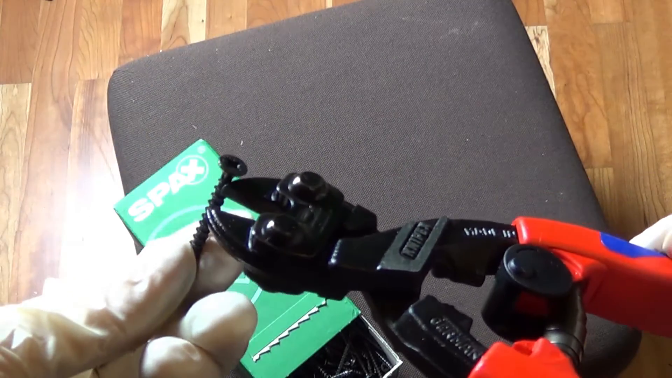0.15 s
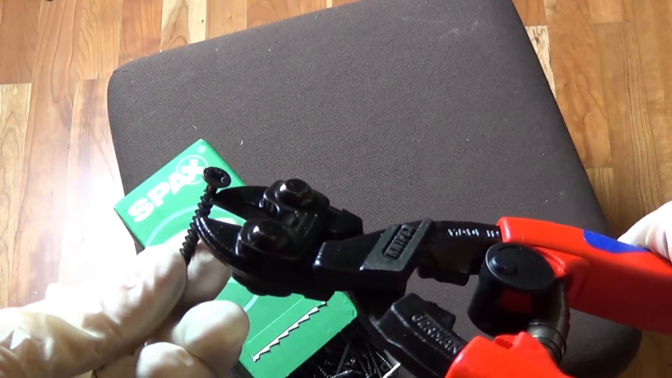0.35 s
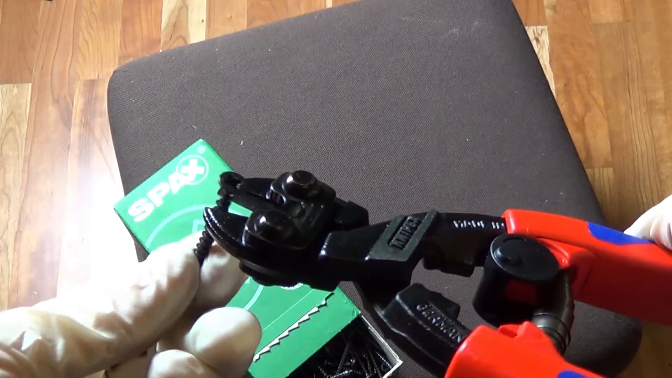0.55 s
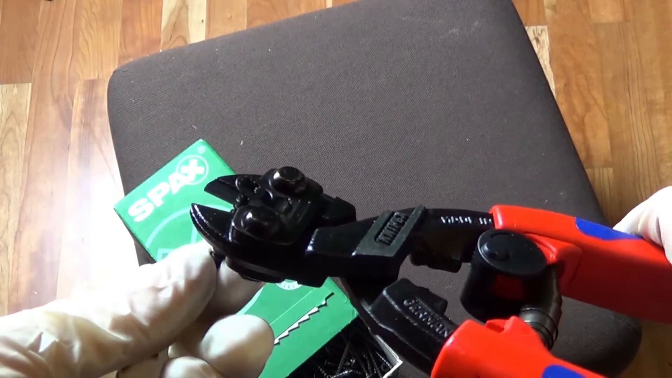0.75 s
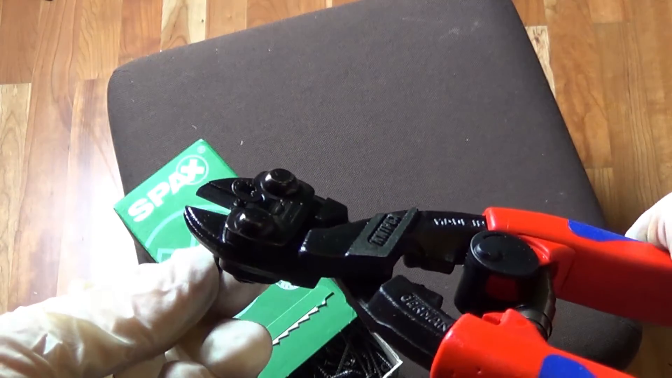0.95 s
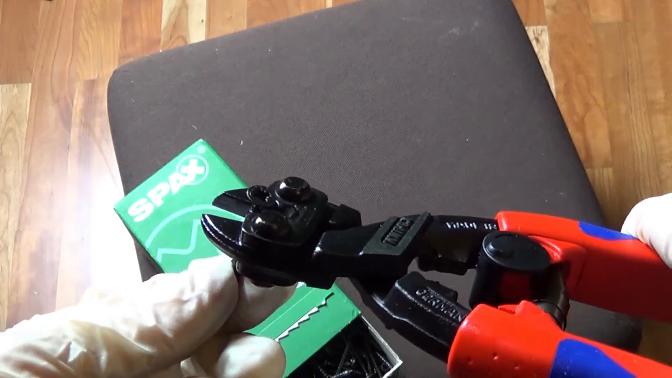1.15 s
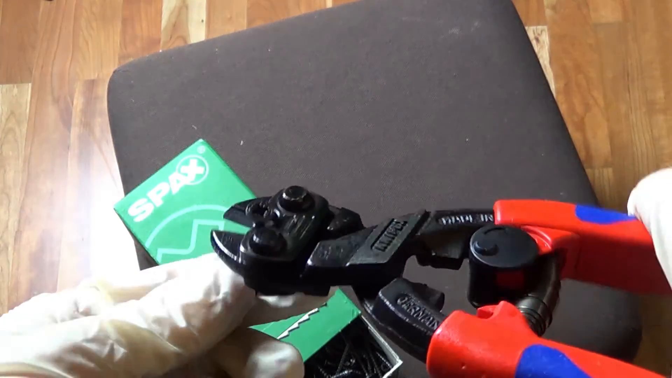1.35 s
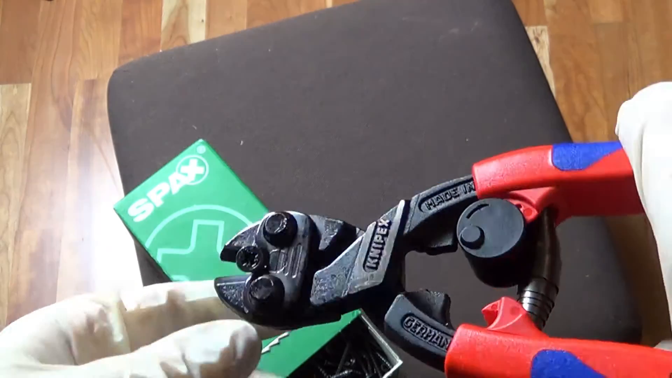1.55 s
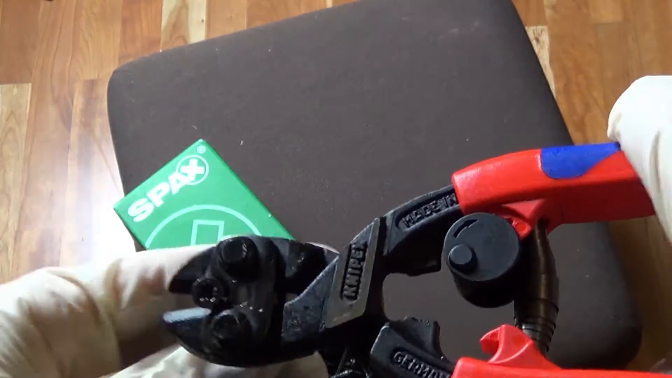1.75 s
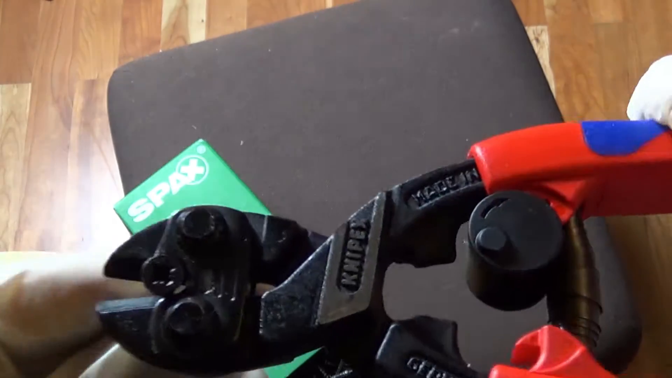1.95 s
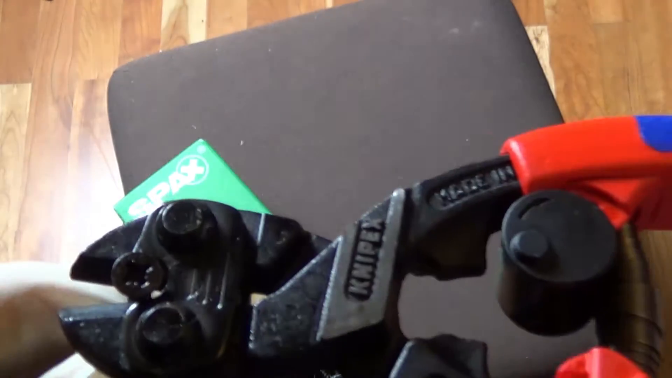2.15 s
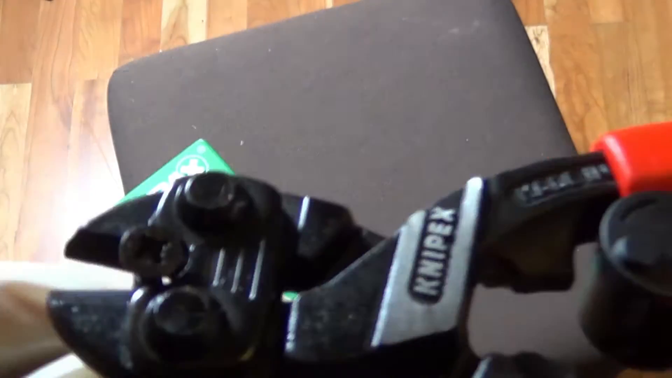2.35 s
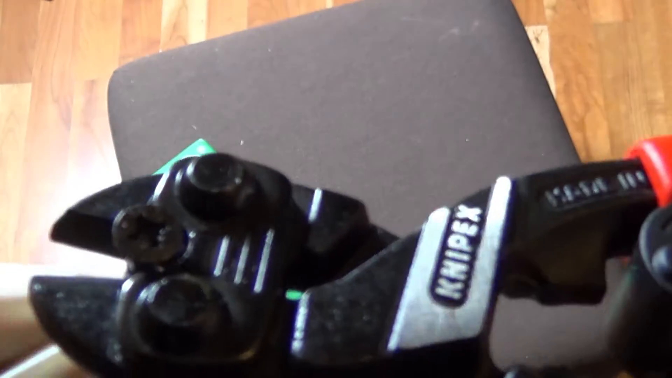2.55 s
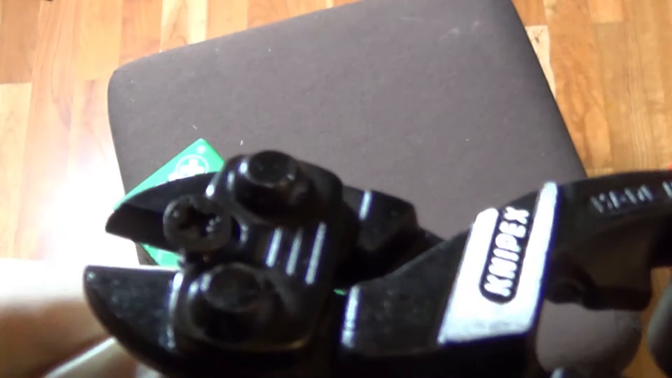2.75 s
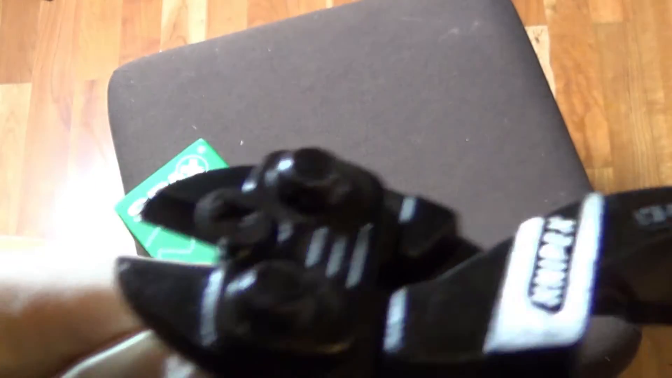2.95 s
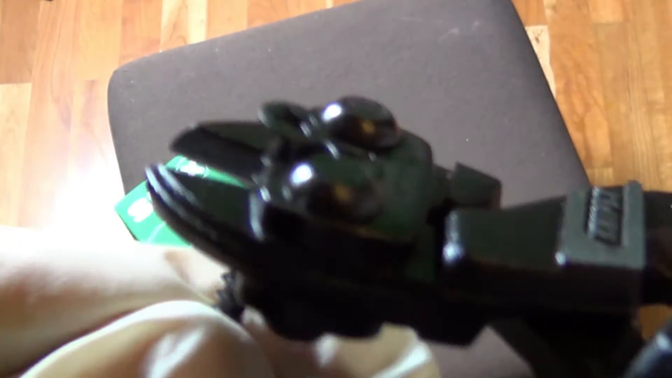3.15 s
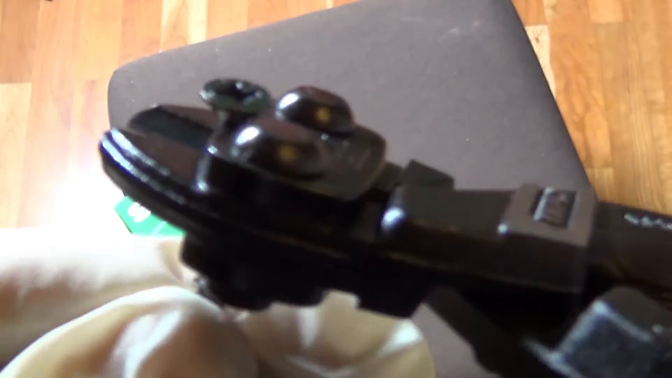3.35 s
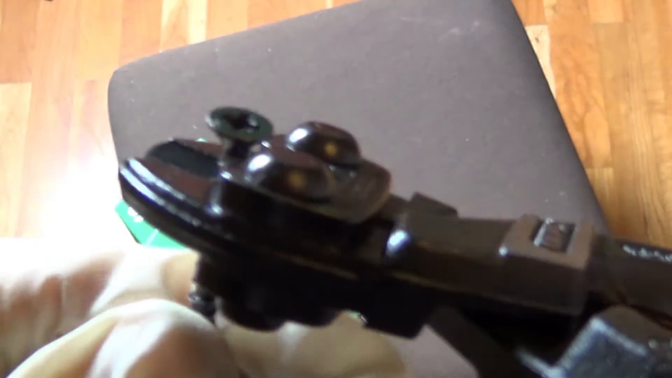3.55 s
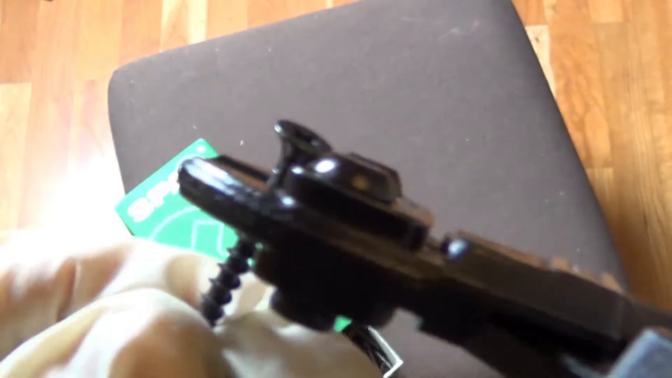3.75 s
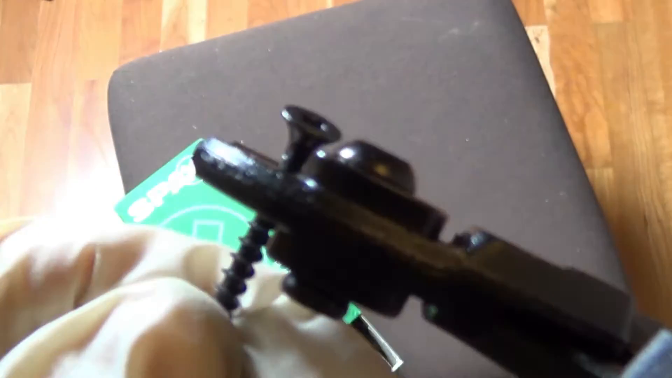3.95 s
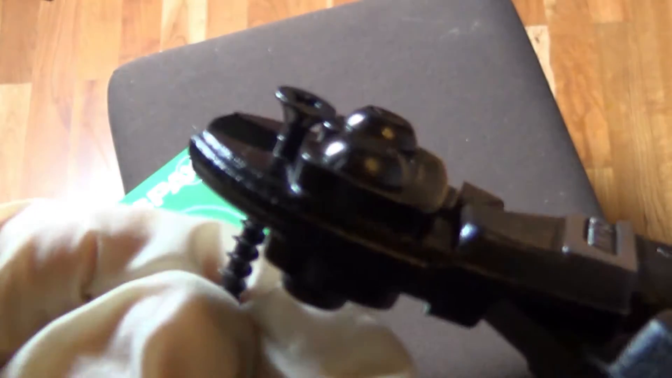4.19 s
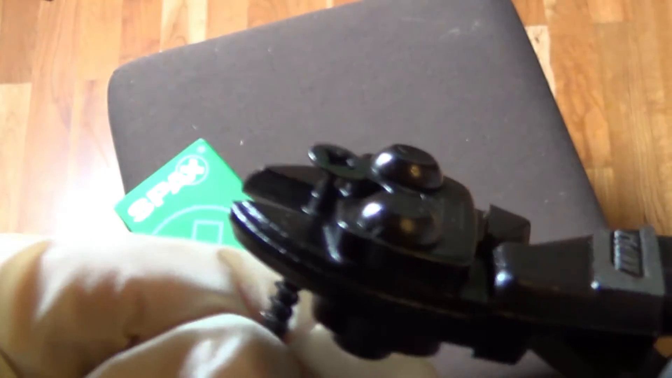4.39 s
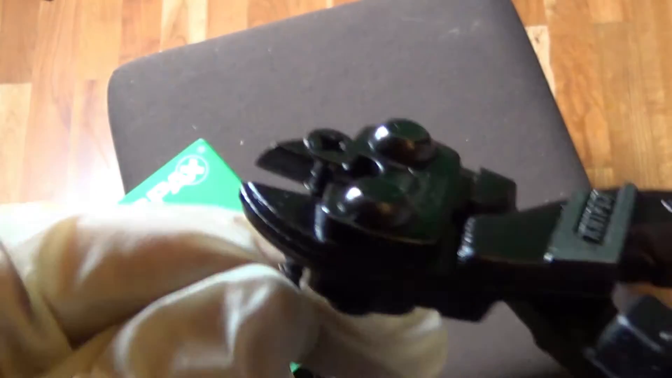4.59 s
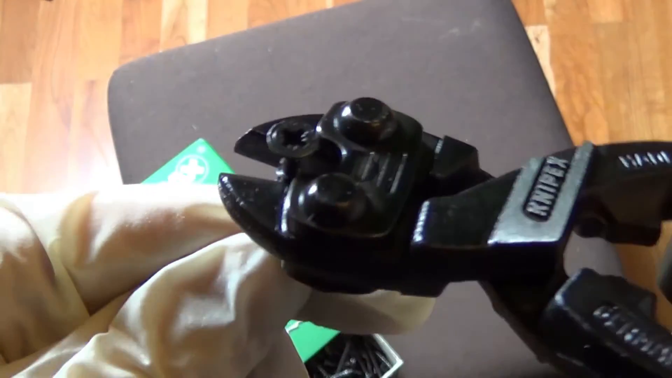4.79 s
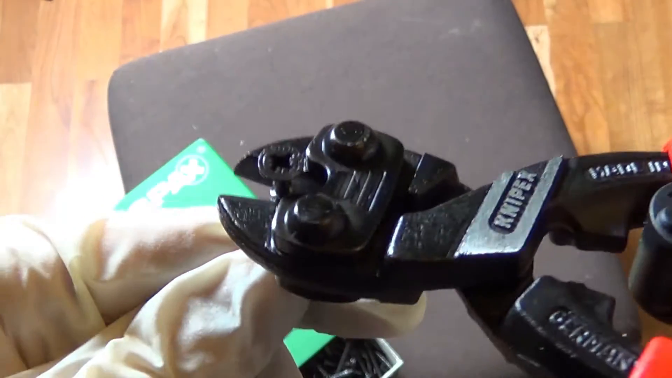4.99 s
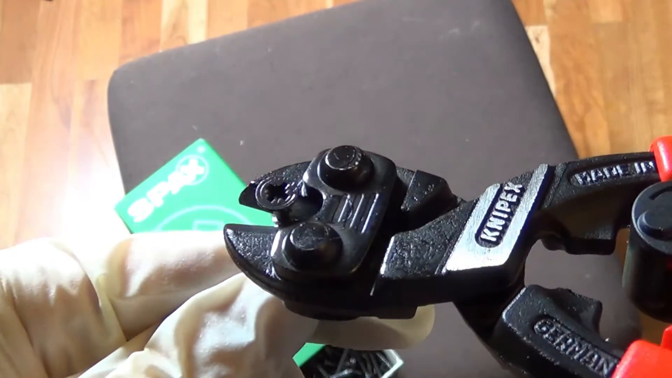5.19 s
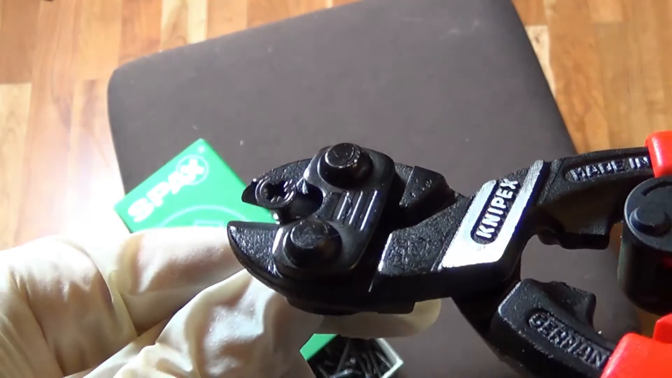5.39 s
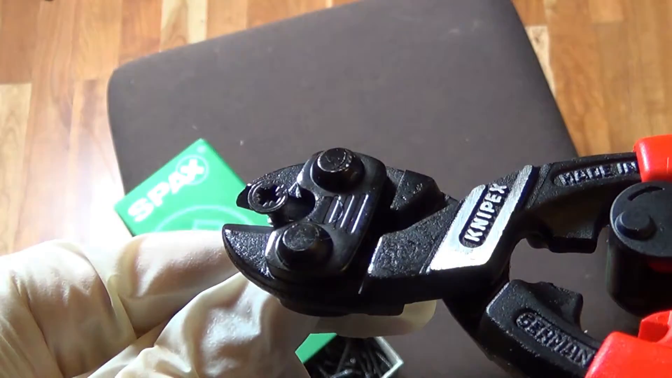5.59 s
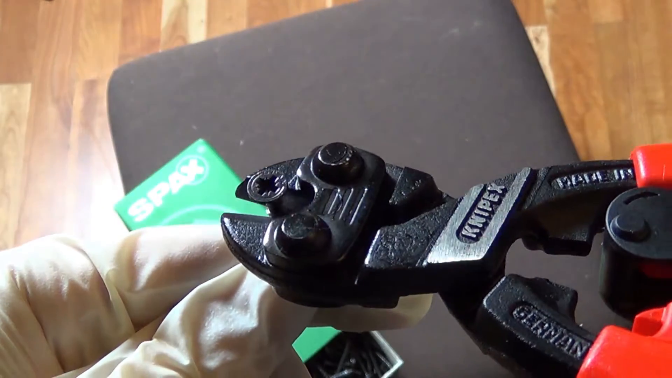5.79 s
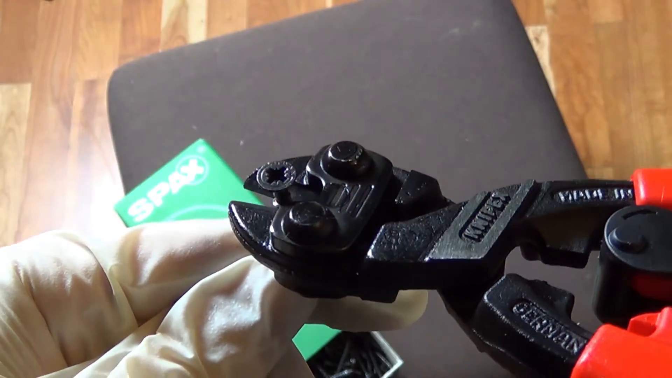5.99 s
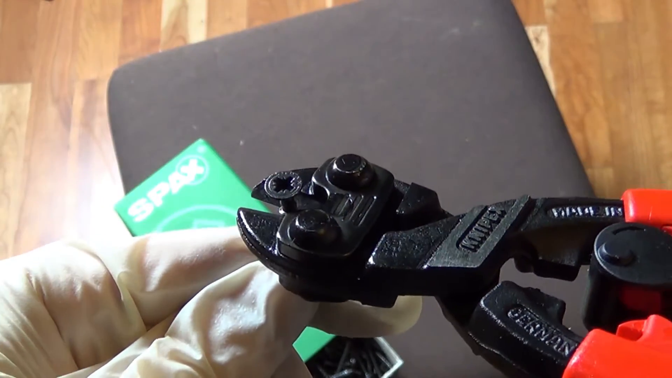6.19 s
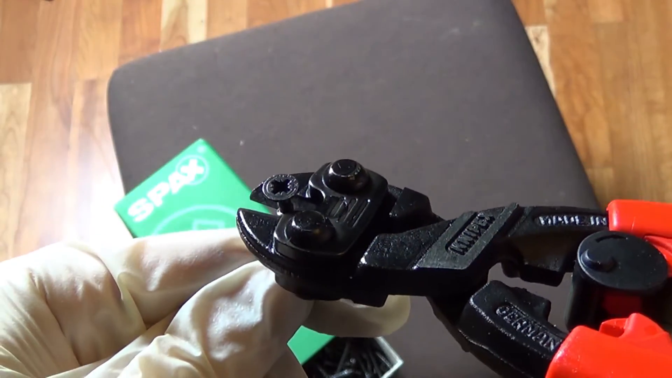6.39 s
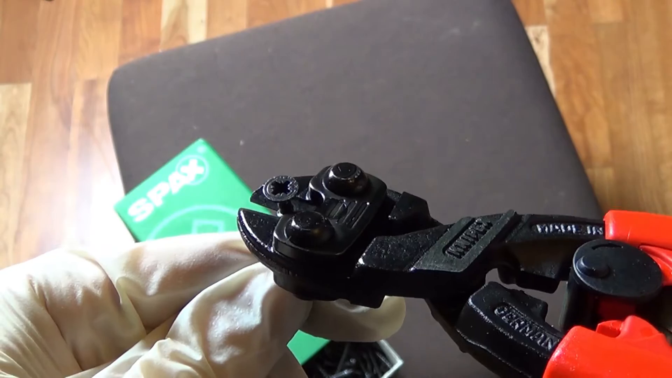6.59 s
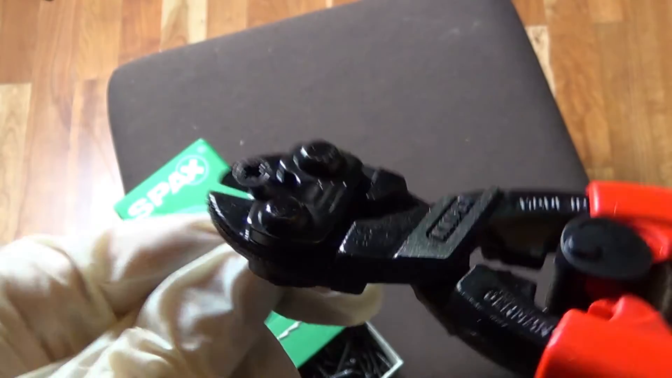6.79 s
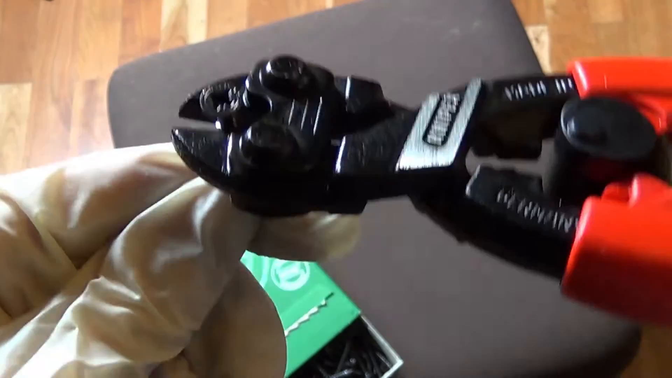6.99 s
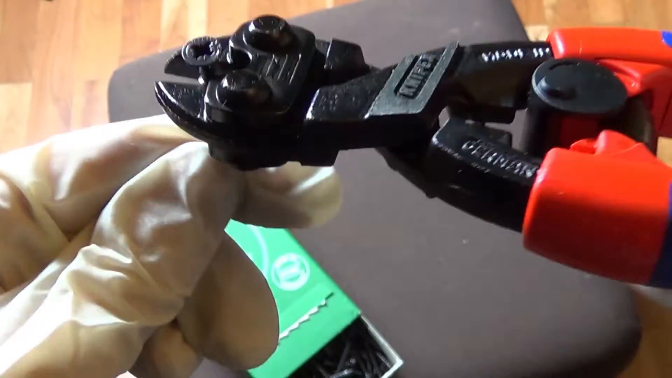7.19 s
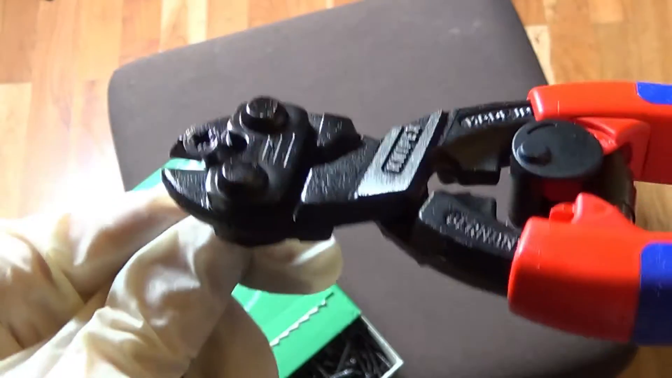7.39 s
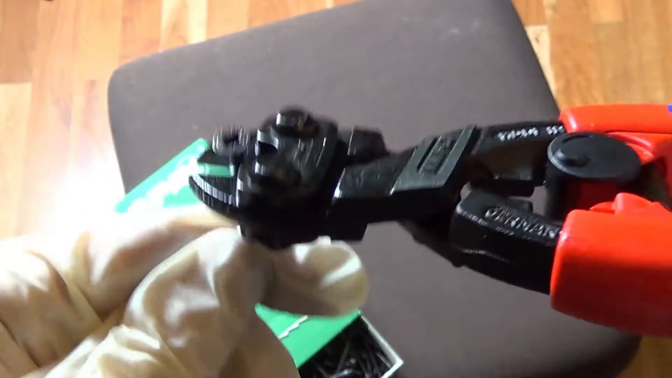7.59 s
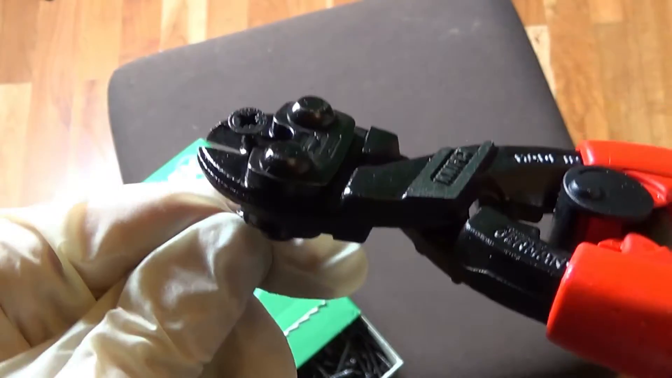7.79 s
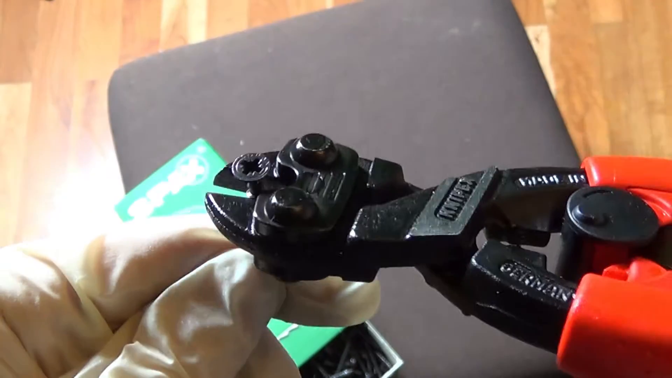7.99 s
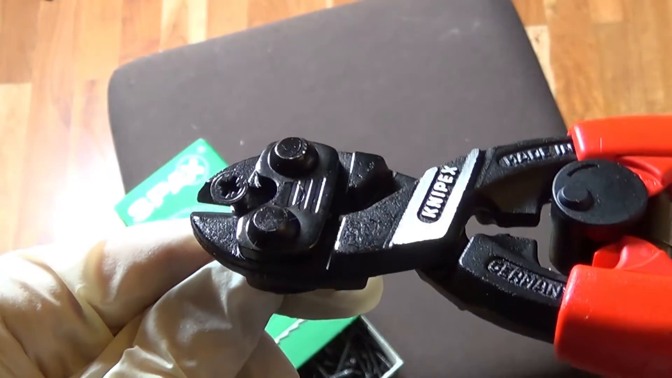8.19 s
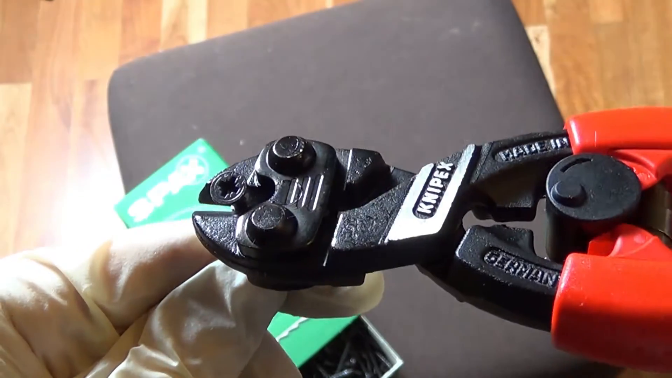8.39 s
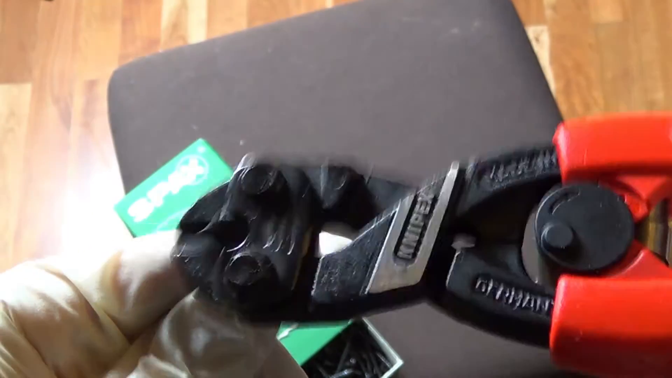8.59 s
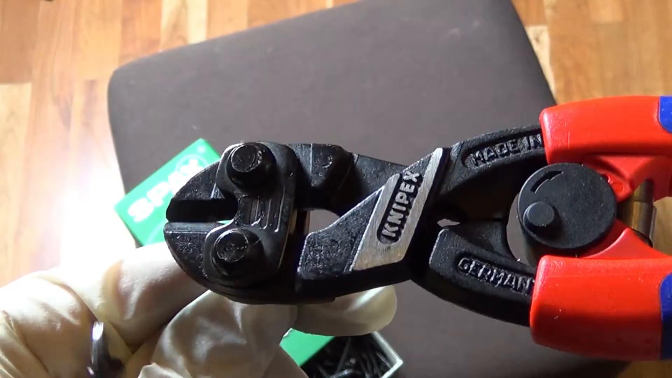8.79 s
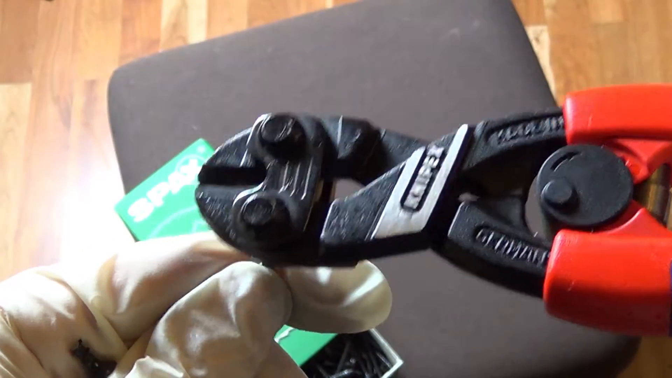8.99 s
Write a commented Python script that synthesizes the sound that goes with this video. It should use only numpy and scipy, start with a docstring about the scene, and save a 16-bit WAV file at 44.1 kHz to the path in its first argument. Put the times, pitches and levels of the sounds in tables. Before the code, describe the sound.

Close glove rustle, small metal clicks and scrapes over faint hiss and buzz, ending in one loud steel snap with a short room echo.

```python
"""Shearing a steel screw

Hands in rubber gloves set a steel screw in the jaws of a small bolt cutter, close by in a quiet room.
Stick-slip noise makes the gloves rub and crackle; struck resonances make the thread tick and scrape.
The screw shears with a snap: decaying modes of jaws and steel arms, and a diffuse echo of the room.
The camera's limiter ducks the snap, so its echo swells up behind it; the camera itself buzzes faintly."""
import sys
import numpy as np
from scipy import signal
from scipy.fft import rfft, irfft, next_fast_len
from scipy.io import wavfile
from scipy.ndimage import uniform_filter1d, minimum_filter1d

SR = 44100
rng = np.random.default_rng(int(sys.argv[2]) if len(sys.argv) > 2 else 0)


def pcm_store(signal):
    """Save signal as 16-bit PCM."""
    levels = np.round(np.clip(np.atleast_2d(signal), -1, 1) * 32767)
    wavfile.write(sys.argv[1], SR, levels.astype(np.int16).T)


N = 398663
TIME = np.arange(N) / SR   # s

# Spectrum of rubber on steel. Each row: frequency in Hz, relative density in dB per Hz.
RUB_COLOUR = [(88, -39), (150, -3), (381, -2.5), (550, -1.5), (631, -0.5), (1370, -2), (1510, -3),
              (2920, 1), (3830, -1), (5440, -4), (7710, -9), (10400, -5), (13000, -11.5), (15500, -31)]
# Strokes of the gloves over screw and grips. Each row: time of firmest pressure in seconds,
# length in seconds, level in dB (before the trim in gloves), treble against the rest in dB.
STROKES = [(0.585, 0.098, -68, -14), (0.873, 0.087, -57.5, 18), (1.12, 0.17, -57, 2.5),
           (1.416, 0.22, -52, 6.5), (1.994, 0.078, -54, 2), (2.11, 0.065, -50, 11), (2.418, 0.048, -50, 10),
           (2.447, .022, -43, -2), (2.575, 0.12, -55, 3.5), (2.851, 0.13, -46.5, 3),
           (3.053, 0.11, -54.5, 5), (3.284, 0.44, -61, -0.5), (3.585, 0.18, -62, 6),
           (3.769, 0.33, -55.5, 4.5), (3.92, .08, -55.5, 2), (4.458, 0.47, -54.5, 1),
           (4.705, 0.27, -56, -2.5), (4.917, 0.065, -45.5, 2.5), (5.267, 0.49, -62, -2),
           (5.429, 0.062, -55, 0), (6.13, 0.99, -62, 2.5), (6.871, 0.15, -57.5, 0),
           (7.005, 0.083, -49.5, 11), (7.055, 0.081, -36.5, 3.5), (7.178, 0.18, -54, 1),
           (7.264, 0.034, -31.5, 8.5), (7.361, 0.08, -48, -3), (7.453, .05, -47, -2),
           (7.579, 0.058, -44.5, 6.5), (7.739, 0.3, -54, -3), (7.889, 0.13, -57, -7),
           (8.366, 0.074, -62, 6), (8.615, 0.065, -51.5, -3), (8.932, 0.41, -62.5, -1)]
# Where the hands work. Each row: time in seconds, left over right in dB.
HANDS = [(0, -5), (1.45, 0.5), (2.33, 2), (2.42, -5), (2.95, -4.5), (3.8, -3.5), (4.92, -4), (5.3, -0.5),
         (7.1, -4), (9, -2)]
# Echo spectrum of the handling. Each row: frequency in Hz, relative level in dB.
WALLS = [(100, 6.5), (4000, -4), (8000, 0), (14000, -12.5)]
# Decay of the room. Each row: frequency in Hz, time to fall by 60 dB in seconds.
ROOM_T60 = [(100, 0.4), (300, 0.35), (1000, 0.41), (2200, 0.33), (4200, 0.35), (8000, 0.26), (14000, 0.24)]
# Likeness of the echo on both sides. Each row: frequency in Hz, left-right correlation from 0 to 1.
ROOM_LIKENESS = [(60, 1), (380, 1), (950, 0.85), (2400, 0.62), (6000, 0.69), (14000, 1)]
# Pitch of the camera's chirp. Each row: time in seconds, frequency in Hz.
CHIRP_PITCH = [(0, 2620), (1.5, 2430), (1.95, 2580), (4.3, 2430), (5.2, 2500), (5.4, 2660), (6.0, 2570),
               (7.3, 2650), (8.4, 2440), (8.9, 2620)]
# The lens motor whines while it seeks focus. Each row: start in seconds, end in seconds.
FOCUS_RUNS = [(0, 0.68), (1.95, 3.5), (5.55, 8.6)]
# Steady background spectrum. Each row: frequency in Hz, relative density in dB per Hz.
HISS_COLOUR = [(20, -3.5), (60, -7), (110, -6), (180, -3), (260, -5.5), (450, -7), (1000, -7.5),
               (1800, -10), (2500, -9.5), (3300, -13.5), (6000, -15), (15000, -20)]
# Likeness of the background on both sides. Each row: frequency in Hz, left-right correlation from 0 to 1.
HISS_LIKENESS = [(60, 0.93), (150, 1), (380, 0.5), (950, 0.081), (2400, 0.26), (6000, 0.65), (14000, 1)]
# Thread sliding along a blade. Each row: centre in seconds, half length in seconds, level in dB,
# ring frequency in Hz.
SCRAPES = [(0.642, 0.084, -70, 1220), (1.48, 0.0027, -40.5, 2130), (1.996, 0.0083, -56, 5460),
           (2.107, 0.011, -49, 5400), (2.61, 0.077, -64.5, 5540), (2.823, 0.063, -54, 5430),
           (3.05, 0.017, -65, 5600), (3.276, 0.0032, -50.5, 2850), (6.0, 0.16, -69, 5330),
           (7.347, 0.057, -55, 5000), (7.756, 0.12, -62, 5700)]
# The thread catches on the blades. Each row: start in seconds, peak in dB, pitch in Hz,
# top resonance against that pitch in dB.
TICKS = [(0.5661, -41, 2750, -11), (0.591, -52, 3060, -5), (1.419, -29, 6040, 24), (1.48, -21, 3340, -4),
         (1.8462, -18.5, 4540, 2.5), (1.943, -32, 2430, 11), (2.0985, -29, 5300, 6),
         (2.3252, -19, 5370, 8.5), (2.341, -32, 2760, 14), (2.407, -31, 5600, 1), (2.4128, -31, 4670, 4),
         (2.4204, -27.5, 5300, 2), (2.4485, -17.5, 5200, 15), (2.6544, -34.5, 5640, 1),
         (2.8314, -31, 2980, -8), (2.887, -27.5, 5530, -10), (2.9048, -22.5, 5100, -1.5),
         (3.0014, -26, 5130, -1.5), (3.272, -30.5, 2740, -10), (3.3107, -39.5, 2420, 10),
         (3.495, -38.5, 2830, 6), (3.8593, -31, 4100, 20), (3.9467, -29, 3770, 3.5), (3.9807, -27, 4170, 2),
         (4.2055, -35, 2270, -10), (4.2295, -30, 2380, 4), (4.4962, -38, 2610, -12),
         (4.8698, -33.5, 3580, 14), (4.917, -21, 3250, -24), (5.3168, -32.5, 6800, 10),
         (5.3585, -30, 3560, 12), (7.049, -21, 4150, -24), (7.0567, -23.5, 4970, -12),
         (7.0798, -18.5, 3240, 1), (7.2533, -12.5, 4700, 10), (7.2572, -18, 3600, -5),
         (7.2715, -15, 3700, -2), (7.2988, -16.5, 4630, -16), (7.3663, -25.5, 2930, -8),
         (7.4403, -21.5, 4500, -13), (7.4537, -45, 4600, -6), (7.5293, -33.5, 4300, -12),
         (7.5709, -27.5, 3660, -7), (7.6944, -31.5, 2640, -13), (7.832, -36.5, 4400, -2),
         (8.55, -39.5, 2440, -10), (8.9835, -32, 4920, 1)]
# Soft knocks of the hand on the grips. Each row: start in seconds, level in dB, frequency in Hz.
BUMPS = [(2.957, -35.5, 184), (5.168, -49, 170), (7.08, -50, 101), (7.327, -40, 184), (7.652, -41, 95),
         (8.628, -16, 135)]
# The screw breaks and the jaws clash shut. Each row: start in seconds, peak in dB before the limiter.
CRACKS = [(8.6259, 3), (8.628, 4), (8.6313, 9), (8.6334, -12)]
# Short ring of jaws and grips. Each row: frequency in Hz, relative level in dB, 60 dB decay in seconds.
JAWS = [(272, -22.5, 0.038), (1700, -33, .004), (4240, -8, 0.0046), (4640, -0.5, 0.0035),
        (9730, 7.5, 0.0031), (10300, -14, 0.0046), (12500, -11, 0.0048)]
# Long ring of steel arms and room. Each row: frequency in Hz, level in dB before the limiter.
RING = [(293, -29.5), (2225, -29), (2686, -32.5), (3567, -41), (3735, -29), (4043, -34), (4086, -31),
        (4431, -41), (4514, -38), (4676, -25), (4996, -43), (8975, -41), (9710, -44), (10082, -45)]
# The room's answer to the snap. Each row: frequency in Hz, relative density in dB per Hz.
ECHO_COLOUR = [(60, -29), (105, -14), (160, -11), (230, -4.5), (290, 1.5), (360, -4.5), (700, -5),
               (1000, -9.5), (2200, 1), (3100, -3.5), (3700, 3.5), (4650, 4), (5800, -3.5), (8000, -2),
               (10200, -2), (12500, -12), (15000, -42)]

# a stroke swells for this share of its length and is this much weaker at both ends
SWELL_SHARE, STROKE_EDGE_DB = 0.52, -10
RESTING_DB = -74.5   # gloves just holding on
# chance catches while the rubbing is above MOVING_DB: rate, height over the rubbing, ceiling of their mean
MOVING_DB, CATCHES_PER_S, CATCH_ABOVE_DB, CATCH_CEILING_DB = -58.5, 8.3, 15.5, -40
CATCH_HZ, CATCH_TREBLE_DB = 2960, -9   # middle of the chance spread
# resonances of a contact below and above its own pitch: (Hz, nominal width Hz)
TICK_LOW, TICK_TOP = (1140, 2480), (9860, 5000)
TICK_LOW_DB = -4.5   # the low resonance against a contact's own pitch


def from_db(db):
    """Decibels to amplitude ratio."""
    return 10 ** (np.asarray(db) / 20)


def rms_one(x):
    """Normalisation to unit root mean square."""
    return x / np.sqrt(np.mean(x ** 2) + 1e-20)


def in_time(rows):
    """Linear interpolation of each column of a curve at every sample."""
    s, *columns = np.transpose(rows)
    return [np.interp(TIME, s, column) for column in columns]


def at_hz(points, hz):
    """Interpolation of a table on a logarithmic frequency axis."""
    table_hz, values = np.array(points).T
    return np.interp(np.log(hz), np.log(table_hz), values)


def panned(x, pan_db):
    """Stereo placement by level difference, left over right."""
    return np.array([x * from_db(pan_db / 2), x * from_db(-pan_db / 2)])


def add(out, s, sound):
    """Superposition: mix a sound in at time s."""
    i = round(s * SR)
    out[..., i:i + sound.shape[-1]] += sound[..., :N - i]


def drift(rate):
    """Slow random fluctuation: chance values at a rate per second, joined by lines, with spread 1."""
    knots = rng.standard_normal(4000)
    return rms_one(np.interp(TIME * rate, np.arange(len(knots)), knots))


def filtered(x, kind, order, hz):
    """Butterworth filtering at one cutoff or between two."""
    return signal.sosfilt(signal.butter(order, hz, kind, fs=SR, output="sos"), x)


def resonance(x, hz, width_hz):
    """Damped resonance: a two-pole band-pass with gain 1 on top."""
    r = np.exp(-np.pi * width_hz / SR)
    zeros = np.array([1, 0, -1]) * (1 - r * r) / 2
    poles = [1, -2 * r * np.cos(2 * np.pi * hz / SR), r * r]
    return signal.lfilter(zeros, poles, x)


def coloured(x, spectrum):
    """Spectral shaping: weight every frequency of a noise by a table."""
    size = next_fast_len(x.shape[-1])
    hz = np.fft.rfftfreq(size, 1 / SR) + 1   # keeps the logarithm finite
    return irfft(rfft(x, size) * from_db(at_hz(spectrum, hz)), size)[..., :x.shape[-1]]


def bands(spectrum, likeness, size):
    """Partial correlation by mid and side: yield (Hz, stereo noise band) in steps of half an octave."""
    noise = coloured(rng.standard_normal((2, 2, size)), spectrum)
    edges = np.geomspace(22, 17000, 20)
    for k, (low, high) in enumerate(zip(edges, edges[1:])):
        # two unrelated pairs are dealt in turn, so neighbouring bands are independent
        mid, side = filtered(noise[k % 2], "band", 2, [low, high])
        hz = np.sqrt(low * high)
        alike = np.clip(at_hz(likeness, hz), 0, .995)
        mid, side = np.sqrt(1 + alike) * mid, np.sqrt(1 - alike) * side
        yield hz, np.array([mid + side, mid - side])


def room_tail(spectrum, build_s):
    """Diffuse reverberation: noise that builds up, then dies exponentially band by band; unit energy."""
    t = TIME[:SR // 2]
    tail = sum(band * from_db(-60 * t / at_hz(ROOM_T60, hz))
               for hz, band in bands(spectrum, ROOM_LIKENESS, size=len(t)))
    return rms_one(tail * (1 - np.exp(-t / build_s))) / np.sqrt(len(t))


def rubbing():
    """Power addition of strokes: level in dB, and brightness in dB as a mean weighted by power."""
    power, colour = from_db(RESTING_DB) ** 2, 0
    for s, length_s, db, bright_db in STROKES:
        # 0 at the firmest pressure, 1 at either end
        away = np.maximum((s - TIME) / SWELL_SHARE, (TIME - s) / (1 - SWELL_SHARE)) / length_s
        stroke = from_db(db + STROKE_EDGE_DB * np.minimum(away, 10)) ** 2
        power = power + stroke
        colour = colour + stroke * bright_db
    return 10 * np.log10(power), colour / power


def slips(per_s, spread_db, smooth_share):
    """Random impulses: jerks of uneven size over a smooth hiss; the rate sets the grain, not the level."""
    sizes = from_db(spread_db * np.minimum(rng.exponential(1, N), 4)) * rng.choice([-1, 1], N)
    per_s = np.minimum(per_s, SR)
    jerks = sizes * (rng.random(N) < per_s / SR) / np.sqrt(per_s)
    return rms_one(jerks) + smooth_share * rng.standard_normal(N)


def gloves(rub_db, bright_db, slips_per_s=1800, usual_db=-58, flutter_db=3.0, split_hz=6500, trim_db=-0.5):
    """Stick-slip friction of rubber: lone crackles under a light touch, a dense rasp under a hard one."""
    per_s = slips_per_s * from_db(rub_db - usual_db)   # slips_per_s holds at usual_db

    def part(kind):
        """Band splitting: an independent rub on one side of split_hz."""
        friction = coloured(slips(per_s, spread_db=4.0, smooth_share=0.29), RUB_COLOUR)
        return rms_one(filtered(friction, kind, 2, split_hz))

    bright = from_db(bright_db)
    rub = (part("low") + bright * part("high")) / np.sqrt(1 + bright ** 2)
    return rub * from_db(trim_db + rub_db + flutter_db * drift(220))


def tone(hz, rms_db):
    """Phase integration: a sine whose phase sums its frequency."""
    return np.sqrt(2) * from_db(rms_db) * np.sin(2 * np.pi * np.cumsum(hz) / SR)


def camera_chirps(level_db=-62.5, frame_phase_s=0.03, chirp_s=0.0037, sweep_hz=50, waver_hz=50):
    """Periodic gating of a tone: a short rough chirp every frame, each falling a little in pitch."""
    frame_s = 1 / 25
    jitter_s = 0.00072 * drift(11)
    offset = (TIME - frame_phase_s + jitter_s + frame_s / 2) % frame_s - frame_s / 2
    gate = np.exp(-.5 * (offset / chirp_s) ** 2)
    pitch = in_time(CHIRP_PITCH)[0] + waver_hz * drift(150) - sweep_hz * offset / chirp_s
    swell_db, rough_db = 1.0 * drift(8), 2 * drift(230)
    return gate * tone(pitch, level_db + swell_db + rough_db)


def lens_motor(level_db=-77, whine_hz=1411):
    """Frequency wander of a running motor: a thin whine, faded in and out over a tenth of a second."""
    running = sum(1.0 * (TIME >= start) * (TIME < end) for start, end in FOCUS_RUNS)
    seeking = uniform_filter1d(running, size=SR // 10)
    return seeking * tone(whine_hz + 8 * drift(30), level_db)


def line_scan(level_db=-71.5, scan_hz=15625):
    """Pure tone of the line scan: a thin steady whistle."""
    return tone(np.full(N, scan_hz), level_db)


def hiss(level_db=-59.5):
    """Stationary noise: room rumble and microphone hiss, alike on both sides to a degree set by band."""
    return from_db(level_db) * rms_one(sum(band for _, band in bands(HISS_COLOUR, HISS_LIKENESS, size=N)))


def scrapes(sharpness=5, rough_db=3):
    """Friction-driven resonance: the sliding thread excites one mode of screw or jaws at a time."""
    friction = rng.standard_normal(N) * from_db(rough_db * drift(300))
    out = np.zeros(N)
    for s, half_s, db, hz in SCRAPES:
        width_hz = hz / sharpness
        ring = rms_one(resonance(resonance(friction, hz, width_hz), hz, width_hz))
        out += from_db(db) * np.exp(-.5 * ((TIME - s) / half_s) ** 2) * ring
    return out


def catches(rub_db, spread_db=2.0, spread_octaves=0.78, treble_spread_db=7):
    """Poisson events: faint chance contacts while the gloves move, as rows like those of TICKS."""
    at = np.flatnonzero((rng.random(N) < CATCHES_PER_S / SR) & (rub_db > MOVING_DB))
    size, pitch, treble = rng.standard_normal((3, N))[:, at]
    peak_db = np.minimum(rub_db[at] + CATCH_ABOVE_DB, CATCH_CEILING_DB) + spread_db * size
    pitch_hz = CATCH_HZ * 2 ** (spread_octaves * pitch)
    return list(zip(at / SR, peak_db, pitch_hz, CATCH_TREBLE_DB + treble_spread_db * treble))


def ticks(contacts, peak_s=0.0011, grip_s=0.00034, settle_db=-22, settle_s=0.0065, rattle_db=4, width_hz=1400):
    """Impact excitation of three resonances: a brief noise burst, then a faint uneven settling."""
    out, t = np.zeros(N), TIME[:SR // 50]
    rattle = from_db(rattle_db * drift(400))
    grit = rng.standard_normal((3, N))   # one noise for each resonance
    for s, peak_db, pitch_hz, treble_db in contacts:
        span = (round(s * SR) + np.arange(len(t))) % N
        settling = from_db(settle_db) * (t > peak_s) * np.exp(-t / settle_s) * rattle[span]
        burst = np.exp(-.5 * ((t - peak_s) / grip_s) ** 2) + settling
        parts = [(TICK_LOW_DB, *TICK_LOW), (0, pitch_hz, width_hz), (treble_db, *TICK_TOP)]
        tick = np.zeros(len(t))
        for noise, (db, hz, width) in zip(grit, parts):
            # two passes narrow the band, so each is made twice as wide
            ring = resonance(resonance(burst * noise[span], hz, 2 * width), hz, 2 * width)
            tick += from_db(db) * rms_one(ring)
        add(out, s, tick / np.abs(tick).max() * from_db(peak_db))
    return out


def bumps(t60=0.025):
    """Heavily damped oscillation: padded knocks of a few low cycles each."""
    out, t = np.zeros(N), TIME[:SR // 10]
    for s, db, hz in BUMPS:
        rise = 1 - np.exp(-t * hz * 2)
        add(out, s, from_db(db - 60 * t / t60) * np.sin(2 * np.pi * hz * t) * rise)
    return out


def jaw_crack(t, contact_s=0.00015):
    """Modal superposition: a blow sets off the damped modes of the jaws; peak 1."""
    crack = np.zeros(len(t))
    for hz, db, t60 in JAWS:
        chance_db = rng.normal(0, 1)
        crack += from_db(db + chance_db - 60 * t / t60) * np.sin(2 * np.pi * hz * t)
    crack *= 1 - np.exp(-(t / contact_s) ** 2)
    return crack / np.abs(crack).max()


def steel_ring(t, build_s=0.0088):
    """Free vibration: long modes of the steel arms, dying at the room's rate, slightly out of step in stereo."""
    ring = np.zeros((2, len(t)))
    for hz, db in RING:
        phase = rng.uniform(0, 2 * np.pi) + rng.normal(0, 0.11, (2, 1))
        ring += from_db(db - 60 * t / at_hz(ROOM_T60, hz)) * np.sin(2 * np.pi * hz * t + phase)
    return ring * (1 - np.exp(-t / build_s))


def snap(echo_db=16, echo_pan_db=-0.6):
    """Impulsive release: the break and its rebounds strike the jaws, the steel rings on, the room answers."""
    out, t = np.zeros((2, N)), TIME[:SR // 2]
    for s, peak_db in CRACKS:
        add(out, s, jaw_crack(t) * from_db(peak_db))
    start = CRACKS[0][0]
    add(out, start, steel_ring(t))
    echo = room_tail(ECHO_COLOUR, build_s=0.0036)
    add(out, start, echo * panned(from_db([echo_db]), echo_pan_db))
    return out


def scene(wet_db=-16.0):
    """Superposition of close handling, its echo by convolution, the snap and the steady background."""
    rub_db, bright_db = rubbing()
    contacts = ticks(list(TICKS) + catches(rub_db))
    close = gloves(rub_db, bright_db) + scrapes() + contacts
    handling = panned(close, in_time(HANDS)[0]) + bumps()
    room = signal.fftconvolve(handling, room_tail(WALLS, build_s=0.00087), axes=1)[:, :N]
    camera = camera_chirps() + lens_motor() + line_scan()
    return handling + from_db(wet_db) * room + snap() + camera + hiss()


def record(dry, ceiling_db=-4, release_db_per_s=400, bass_cut_hz=32, top_cut_hz=16300):
    """Peak limiting: gain ducks at once and recovers at a constant rate; deep bass and top are cut."""
    over_db = np.maximum(20 * np.log10(np.abs(dry).max(axis=0) + 1e-9) - ceiling_db, 0)
    over_db = -minimum_filter1d(-over_db, size=21)   # hold each peak, a few samples early and late
    release_db = release_db_per_s * TIME
    duck_db = np.maximum.accumulate(over_db + release_db) - release_db
    limited = dry * from_db(-uniform_filter1d(duck_db, size=15))
    limited = filtered(limited, "high", 2, bass_cut_hz)
    return signal.sosfilt(signal.ellip(10, .1, 70, top_cut_hz, fs=SR, output="sos"), limited)


dry = scene()
out = record(dry)
pcm_store(out)
```